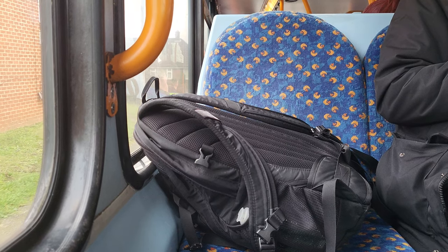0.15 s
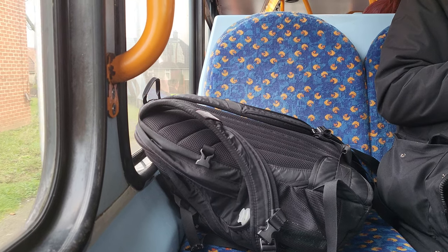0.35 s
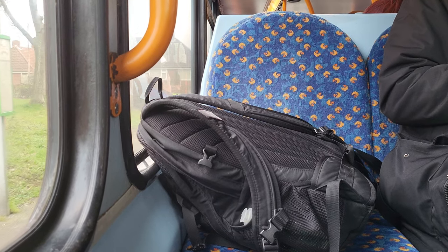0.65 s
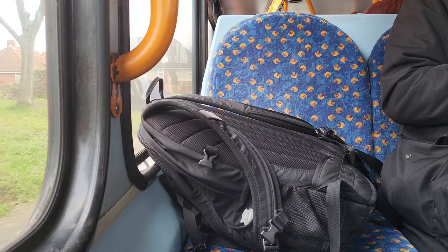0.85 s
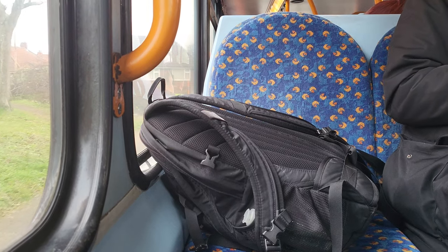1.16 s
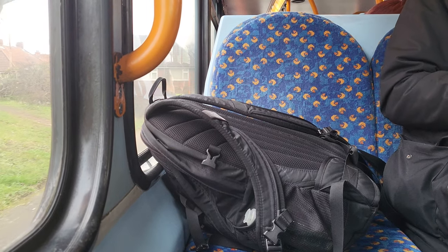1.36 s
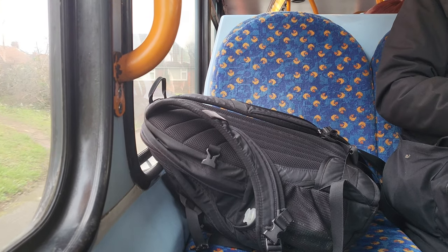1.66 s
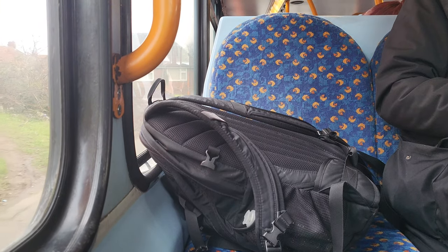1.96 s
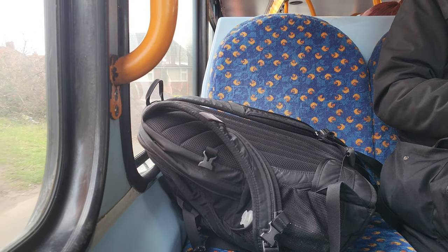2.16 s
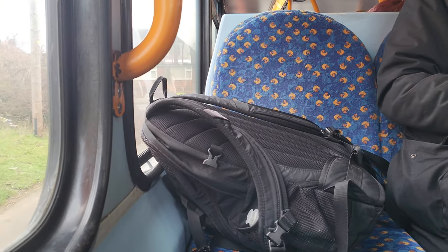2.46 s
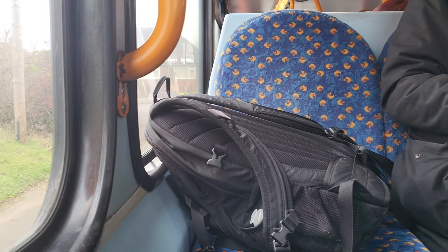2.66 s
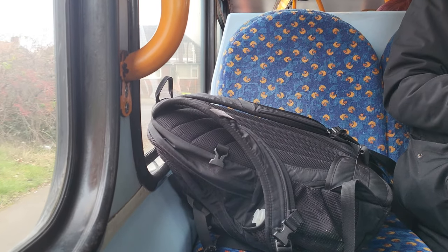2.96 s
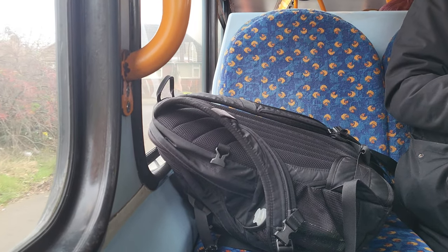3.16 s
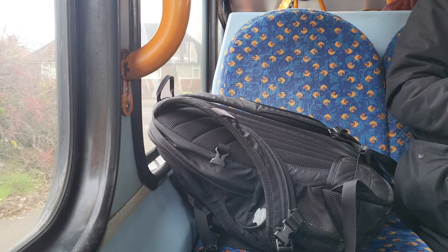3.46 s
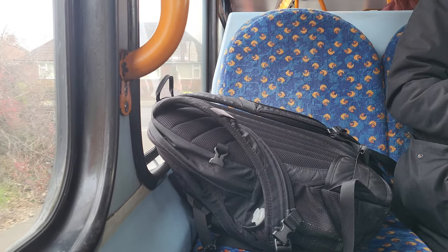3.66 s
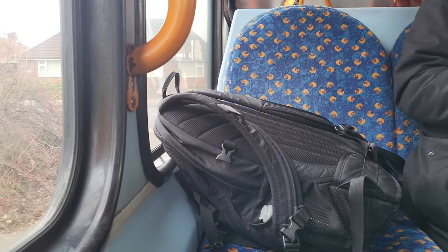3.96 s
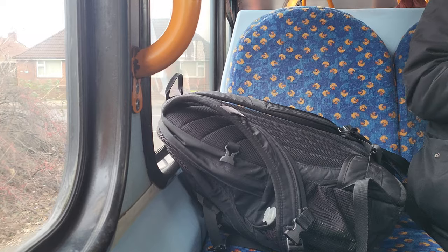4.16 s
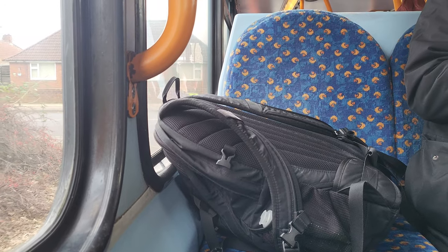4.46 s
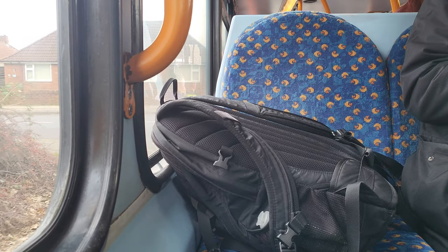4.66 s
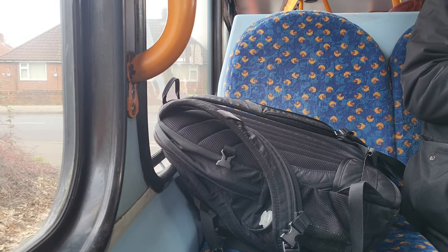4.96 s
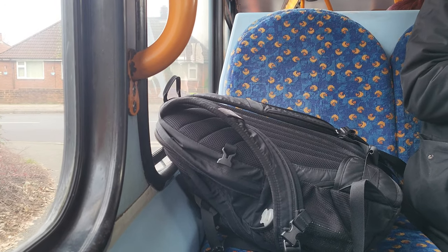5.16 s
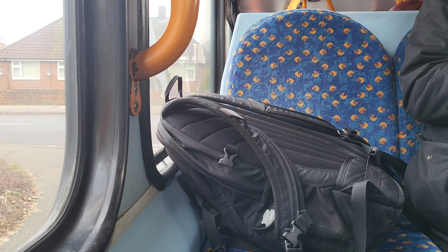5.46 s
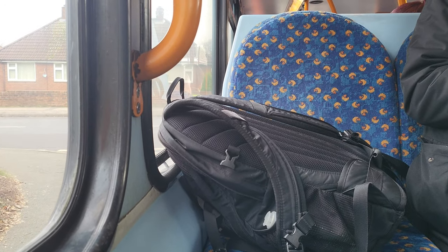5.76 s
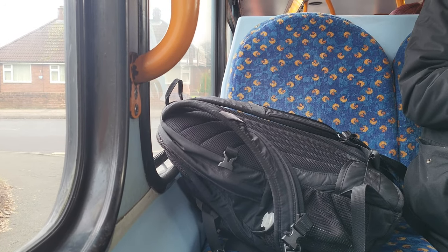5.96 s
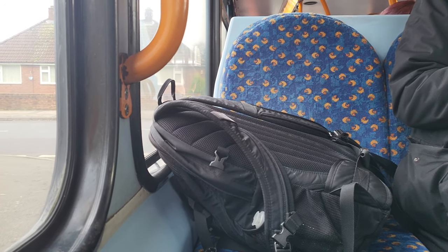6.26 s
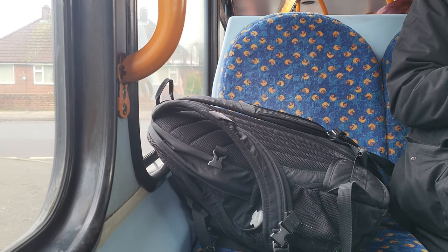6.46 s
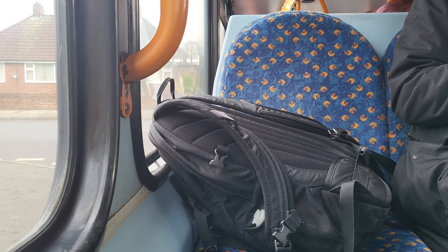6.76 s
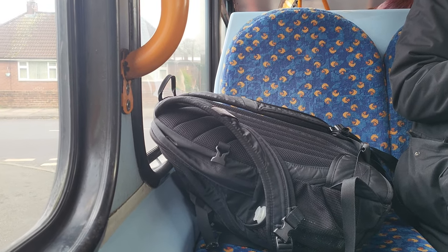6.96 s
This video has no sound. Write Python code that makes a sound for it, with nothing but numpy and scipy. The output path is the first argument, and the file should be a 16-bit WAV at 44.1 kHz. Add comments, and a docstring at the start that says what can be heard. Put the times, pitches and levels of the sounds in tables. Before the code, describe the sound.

Close cabin sound in stereo. A loud, low diesel roar climbs slightly, then the driver eases off and the note falls quickly while a brief gear whine and faint turbo whistle fade. Rumbling floor, thudding body and rattling panels accompany slowing. The engine throbs quietly and unevenly near idle, then accelerates again in the last half second.

```python
"""Inside a diesel bus, on a seat near the window: the six-cylinder engine pulls, lifts off, sinks to idle
while the brakes squeal thinly, and picks up again. The engine is a stack of sines on its firing and crank orders.
Exhaust leak, clatter and drone are noises pulsed by the firings; rumble, hum, buzz and air are shaped noises,
and a high noise band opens and closes. Turbocharger, axle gear, brakes and alternator are thin wandering sines.
Bumps in the road knock the body with decaying sines and shake the panels with grainy noise."""
import sys
import numpy as np
from scipy.fft import rfft, irfft, next_fast_len
from scipy.io import wavfile
from scipy.ndimage import uniform_filter1d

SR = 44100
rng = np.random.default_rng(int(sys.argv[2]) if len(sys.argv) > 2 else 0)


def store_wav(level_fs):
    """Save 16-bit WAV to argv[1]."""
    pcm = np.round(np.clip(np.atleast_2d(level_fs), -1, 1) * 32767)
    wavfile.write(sys.argv[1], SR, pcm.T.astype(np.int16))


N = 313551  # length in samples

# engine speed: t/s, firing rate/Hz
ENGINE_SPEED = [(0, 63.5), (.4, 65.4), (1.25, 67.7), (1.56, 68.3), (1.68, 64.5), (1.96, 52.3), (2.18, 45),
                (2.33, 38.1), (2.45, 37.6), (2.81, 38.2), (2.93, 36.4), (3.21, 34.5), (3.52, 32.4),
                (3.68, 32), (3.88, 33), (4.1, 38.6), (4.32, 37.4), (4.65, 36.3), (5.25, 35.4), (5.92, 35.2),
                (6.18, 35.8), (6.54, 35.8), (6.71, 39.8), (6.99, 48.7), (7.11, 51.8)]
# driving effort and road: t/s, engine load re idle level/dB, road roughness re smooth level/dB
LOAD_AND_ROAD = [(0, 11.5, 1.5), (.25, 14, 1), (.6, 12, 1), (1.3, 13, -2), (1.55, 11, -0.5), (1.68, 2, 5),
                 (1.9, 2, -1), (2.2, -5.5, 3.5), (2.42, -3.5, 6), (2.7, -4, -2), (3.15, -2, 2),
                 (3.35, -1.5, 5.5), (3.55, 0.5, 0), (3.85, -5, 8), (4.12, -1.5, -3), (5.0, -4.5, -1),
                 (5.5, 0.5, 0), (6.4, -2.5, 1), (6.66, -0.5, 1), (6.77, 2, 2.5), (6.82, 6, 0),
                 (6.95, 8.5, -2), (7.11, 8.5, 2.5)]
# firing orders in the cabin: t/s, first level/dB, second level/dB, fourth level/dB, all others re PIPE_PASS level/dB
FIRING_ORDERS = [(0, -23.5, -23.5, -37, 7.5), (.28, -17, -16.5, -22, 11.5), (.42, -22.5, -19, -25.5, 10),
                 (1.25, -13, -22.5, -27.5, 11.5), (1.58, -15, -23.5, -27, 10.5),
                 (1.7, -25, -25.5, -32.5, -3), (1.85, -34.5, -31, -42, -3), (2.0, -27.5, -42.5, -32, -3.5),
                 (2.22, -26, -36.5, -51, -5.5), (2.33, -24.5, -28, -23, -5), (2.45, -18.5, -28.5, -42, -5),
                 (2.6, -27, -33, -27, -7.5), (2.81, -18.5, -28, -31, 2), (2.93, -25, -25.5, -25, -4.5),
                 (3.3, -20.5, -25.5, -26, -5.5), (3.55, -23.5, -33, -26.5, -2.5),
                 (3.8, -25, -27.5, -33, 1.5), (3.93, -18, -21.5, -25, 1), (4.0, -20.5, -22.5, -28.5, -5.5),
                 (4.3, -24, -24.5, -28.5, -1), (4.65, -26.5, -24, -37, -8), (4.9, -24, -22, -38, -3),
                 (5.3, -20, -29, -29.5, 1.5), (5.62, -18.5, -28, -28.5, -2.5), (5.92, -18.5, -24, -26, -5),
                 (6.18, -21.5, -24.5, -29.5, -1.5), (6.54, -19, -19.5, -39, -3),
                 (6.72, -15.5, -20, -23.5, 1.5), (6.82, -16, -36.5, -28, -0.5),
                 (6.93, -24.5, -24, -34, 2.5), (7.11, -13.5, -30.5, -36, 3.5)]
# how exhaust and cabin pass the other firing orders: f/Hz, level/dB
PIPE_PASS = [(95, -34.5), (106, -32), (116, -39.5), (150, -26.5), (178, -33.5), (200, -32), (215, -31.5),
             (226, -25.5), (250, -32.5), (268, -32), (282, -25.5), (305, -40.5), (335, -42.5), (372, -37),
             (388, -26), (408, -49.5), (460, -40.5), (540, -40), (600, -53), (670, -52.5), (740, -40.5),
             (810, -45.5), (870, -39.5), (960, -62)]
# how the cabin passes the weak crank orders: f/Hz, gain/dB
CABIN_PASS = [(20, -22), (45, -11), (100, -8), (180, -5), (280, -22.5), (350, -18.5), (410, -17),
              (480, -11.5), (600, -22), (750, -39.5), (900, -23), (1000, -50.5)]
# how each layer rides the drive: layer: (base level/dB, dB per dB of load, dB per dB of roughness)
LAYER_FOLLOW = {"crank": (-46, 1.17, 1), "clatter": (-51, -0.22, 0.09), "rumble": (-28.5, 0.32, .9),
                "buzz": (-47.5, .5, 0.97), "hum": (-43, 0.97, 0.12), "drone": (-36, 0.47, .6),
                "leak": (-51, 0.8, .1), "air": (-76.5, 0.73, .1)}
# noise colours, of which only the shape counts: f/Hz, level/dB per Hz
LEAK_COLOUR = [(650, -37.5), (1100, 3.5), (1140, -1), (1330, -1.5), (1410, -8), (1590, -2.5), (1690, -6),
               (2410, -2.5), (3040, -16), (3340, -11), (3960, -17.5), (4630, -16), (6040, -21),
               (7370, -27.5), (8600, -49.5), (11200, -70), (18900, -120)]
DRONE_COLOUR = [(200, -30.5), (300, 1), (350, 6), (410, -5.5), (465, 3.5), (560, -4.5), (700, -6.5),
                (1000, -10), (1500, -19.5), (2200, -62)]
RUMBLE_COLOUR = [(6, -28), (16, -6), (28, 3), (40, 15), (90, 10.5), (150, 8.5), (260, 7), (330, -9.5),
                 (500, -58)]
PANEL_COLOUR = [(300, -59.5), (500, 6.5), (1000, -1), (2200, 0.5), (4000, -4.5), (8000, -19), (12000, -24),
                (15500, -30.5)]
HIGH_BAND_COLOUR = [(4120, -30), (7000, 8), (7610, 5), (8330, -7), (13200, -2), (14700, -10.5),
                    (15600, -17)]
AIR_COLOUR = [(5000, -10.5), (7500, 9), (8500, -2.5), (11000, 3.5), (12000, -8), (15600, -9.5)]
# resonances of engine cover, floor pans and seat frames: f/Hz, -6 dB width/Hz, relative level/dB
COVER_MODES = [(1110, 830, 9), (1700, 210, 5), (2140, 470, 2), (3050, 170, -3), (4426, 650, -4),
               (5840, 210, -17.5), (6660, 850, -18)]
FLOOR_PAN_MODES = [(222, 5.5, 0), (279.8, 14, -3.5), (384.2, 7.2, -3), (668, 6.9, -11)]
SEAT_FRAME_MODES = [(452.4, 18, 1.5), (486, 9.9, -1.5)]
# bumps: t/s, rattle level/dB, thud level/dB, rattle tilt/dB per octave, rattle t60/s,
# loudest panel f/Hz, its boost level/dB
ROAD_BUMPS = [(0.289, -20.5, -3.5, -3.5, 0.14, 2320, 4.5), (.302, -28, -24.5, -0.5, 0.3, 1390, 5),
              (0.396, -40, -9.5, 1, 0.33, 2400, 5.5), (2.131, -32.5, -22.5, -5.5, 1, 476, 29.5),
              (2.015, -42.5, -31, 0.5, .08, 1910, 30), (2.258, -48, -34.5, -1, 0.07, 3550, 20.5),
              (2.359, -41, -9, -3.5, 0.14, 475, 7), (2.404, -42, -21.5, -4.5, 0.23, 1870, 7.5),
              (2.883, -43.5, -13.5, 1.5, 0.18, 5900, 11.5), (3.386, -38, -22.5, -5.5, 0.12, 2140, 17.5),
              (3.826, -26, -10.5, -10, 0.32, 485, 8.5), (3.869, -49.5, -20.5, 3.5, 0.51, 3560, 4.5),
              (3.966, -54, -8.5, 2, 0.26, 2000, 0.5), (4.091, -44, -13.5, 0.5, 0.17, 1520, 19),
              (4.151, -52.5, -15, 4, .15, 11000, 3.5), (4.43, -40, -29.5, -6, .2, 490, 15),
              (4.503, -62.5, -15.5, 2, 0.045, 500, 13.5)]
# body modes of a thud: f/Hz, relative level/dB, t60/s
BODY_MODES = [(45.7, -0.5, 0.22), (75.6, -2, 0.18), (144.8, -12, 0.48)]
# brake squeals, one list each: t/s, f/Hz, level/dB
BRAKE_SQUEALS = [
    [(2.57, 12242, -88), (2.62, 12519, -63), (2.686, 12723, -64), (2.9, 12795, -60), (3.134, 12775, -57),
     (3.19, 12810, -61), (3.222, 12965, -67), (3.3, 12806, -80)],
    [(3.55, 14362, -80), (3.75, 14238, -82), (4.4, 14295, -72), (4.6, 14202, -77), (5.06, 14120, -74),
     (5.5, 14280, -77), (5.75, 14285, -71), (6.0, 14313, -75), (6.12, 14240, -77), (6.22, 13967, -83)],
]
# axle gear whine: t/s, f/Hz, level/dB
AXLE_WHINE = [(1.15, 428, -44), (1.35, 446, -36), (1.55, 462, -33), (1.8, 477, -36), (2.0, 484, -44)]
# turbocharger running down: t/s, f/Hz, level/dB
TURBO_WHISTLE = [(1.5, 5750, -74), (1.65, 5600, -69), (1.85, 5350, -70), (2.0, 5200, -76)]
# alternator lines: f/Hz, level/dB
ALTERNATOR_LINES = [(577, -53.5), (866, -61)]
# spells when the band above 7 kHz is open: start t/s, length/s, level/dB before HIGH_BAND_TRIM_DB
BAND_SPELLS = [(0, 0.13, -61.5), (0.281, 0.054, -48), (0.364, 0.084, -67), (1.269, .39, -65.5),
               (1.769, 0.042, -71.5), (2.379, 0.17, -68), (2.869, 0.066, -72.5), (3.282, 0.48, -67),
               (3.836, 0.5, -68), (6.881, 0.27, -74.5)]
# stereo width: f/Hz, left-right likeness (1 same, 0 unrelated, -1 opposed)
LIKENESS = [(60, 0.99), (99, 1), (160, 0.99), (270, 1), (450, 0.25), (740, 0.51), (1220, -0.66),
            (2010, -0.11), (3330, -0.039), (5500, -0.083), (9080, -0.12), (15000, 0.91)]
# stereo balance: f/Hz, left minus right level/dB
BALANCE = [(60, 0.5), (110, -3), (200, 1.5), (380, -0.5), (700, -4), (1290, 0.5), (2380, -3.0), (4400, 3),
           (8120, -0.5), (15000, 9.5)]

# the firing orders waver more in this stretch, off load and braking
UNSTEADY_FROM_S, UNSTEADY_TO_S = 1.66, 4.0
STEADY_WAVER_DB, UNSTEADY_WAVER_DB = 0.9, 4
BLUR_RAD_PER_DB = 0.06  # phase blur per dB of waver, for each octave above the first order
ORDER_FALL_DB = 10  # per octave of order above the third
DRONE_TRIM_DB, HIGH_BAND_TRIM_DB = -4.0, 1.5
SPELL_EDGE = 0.23  # share of a spell spent opening, and again closing
TOP_HZ = 15760  # band limit


def engine(firings, rate, weak_db):
    """Firing orders line up into one push per firing at speed and slide apart towards idle.
    Unequal cylinders add a weak line at every crank order, three of which span one firing order."""
    loose_rad = 0.25 + 1.6 * (rate.max() - rate) / rate
    t = np.arange(N) / SR
    unsteady = (t > UNSTEADY_FROM_S) & (t < UNSTEADY_TO_S)
    waver_db = np.where(unsteady, UNSTEADY_WAVER_DB, STEADY_WAVER_DB)
    waver_db = uniform_filter1d(waver_db, size=SR // 10)
    first_db, second_db, fourth_db, others_db = curves(FIRING_ORDERS)
    strong = {1: first_db, 2: second_db, 4: fourth_db}
    out = 0
    for crank_order in range(2, 43):
        order = crank_order / 3
        hz = order * rate
        if crank_order % 3:
            db = weak_db + along(CABIN_PASS, hz) + 3 * wobble(2.5)
            start = 2 * np.pi * rng.random()
        else:
            if order in strong:
                db = strong[order]
            else:
                fall_db = ORDER_FALL_DB * np.log2(order / 3)
                db = others_db + along(PIPE_PASS, hz) - fall_db + waver_db * wobble(14)
            db = db + 0.9 * wobble(14)
            blur = BLUR_RAD_PER_DB * waver_db * np.log2(order) * wobble(25)
            start = 0.7 + loose_rad * wobble(0.8) + blur
        out += tone(order * firings, hz, db, start)
    return out


def chuff_pulse(firings):
    """Gain that jumps at each firing and dies away, harder for some cylinders and varying shot to shot."""
    which = firings.astype(int)
    cylinder_db = rng.normal(0, 6.7, size=6)[which % 6]
    shot_db = rng.normal(0, 3.3, which[-1] + 1)[which]
    return 1 + 0.24 * amp(cylinder_db + shot_db) * np.exp(-3 * (firings % 1))


def exhaust_leak(db, chuff):
    """Gas escaping from the leaking exhaust: noise chuffing once per firing."""
    noise = rush(lambda hz: along(LEAK_COLOUR, hz), chuff)
    return amp(db + 0.72 * wobble(11.0)) * noise


def valve_clatter(db, chuff):
    """Valves beating with the firings, noise ringing through the engine cover resonances."""
    noise = rush(lambda hz: peaks_db(COVER_MODES, hz), chuff ** 0.47)
    return amp(db + 1.1 * wobble(7.7)) * noise


def drone(db, chuff):
    """A low-mid noise drone, gently pulsed by the firings."""
    noise = rush(lambda hz: along(DRONE_COLOUR, hz), chuff ** 0.35)
    return amp(db + DRONE_TRIM_DB + 0.47 * wobble(4.3)) * noise


def bumps():
    """Each bump thuds the body modes and sets loose panels rattling in grainy, decaying noise."""
    out, t = np.zeros((2, N + SR)), np.arange(SR // 2) / SR
    for s, db, thud_db, tilt_db, t60, panel_hz, panel_db in ROAD_BUMPS:
        modes = [amp(level - 60 * t / decay) * np.sin(2 * np.pi * hz * t) for hz, level, decay in BODY_MODES]
        thud = -sum(modes) * (1 - np.exp(-t / 0.01))
        grain_db = 6.1 * uniform_filter1d(rng.standard_normal(len(t)), size=64)

        def colour_db(hz):
            """Panel colour with the loudest panel standing out and a tilt around 2 kHz."""
            loudest = panel_db / (1 + (hz - panel_hz) ** 2 / (0.08 * panel_hz) ** 2)
            return along(PANEL_COLOUR, hz) + loudest + tilt_db * np.log2(hz / 2000 + 0.01)

        rattle = rush(colour_db, amp(grain_db), len(t))
        fall = amp(db - 60 * t / max(t60, 0.02)) * (1 - np.exp(-t / 0.0024))
        begin = round(s * SR)
        out[:, begin:begin + len(t)] += amp(thud_db) * thud + fall * rattle
    return out[:, :N]


def rumble(db):
    """Floor and body rumbling in lumps: low noise under a restless level."""
    return amp(db + 1.5 * wobble(9)) * rush(lambda hz: along(RUMBLE_COLOUR, hz))


def floor_hum(db):
    """Floor pans humming: noise through narrow resonances."""
    return amp(db) * rush(lambda hz: peaks_db(FLOOR_PAN_MODES, hz))


def seat_buzz(db):
    """Seat frames buzzing: noise through two resonances, fluttering in level."""
    return amp(db + 4 * wobble(5)) * rush(lambda hz: peaks_db(SEAT_FRAME_MODES, hz))


def brakes():
    """Brakes squealing as thin, high, wandering tones."""
    return sum(glide(rows, flutter_db=3, drift_hz=40) for rows in BRAKE_SQUEALS)


def axle_gear():
    """The axle gear whining as one gliding tone."""
    return glide(AXLE_WHINE, flutter_db=0.5, drift_hz=15.8)


def turbocharger():
    """The turbocharger running down: a whistle sliding lower."""
    return glide(TURBO_WHISTLE, flutter_db=1.5, drift_hz=90)


def alternator():
    """Faint alternator lines that hold their pitch but for a small jitter."""
    lines = [[(0, hz, db), (N / SR, hz, db)] for hz, db in ALTERNATOR_LINES]
    return sum(glide(rows, flutter_db=3.5, drift_hz=14) for rows in lines)


def high_band_noise():
    """A high noise band that opens and closes, overlapping spells adding in power."""
    t = np.arange(N) / SR
    power = 1e-12
    for s, length, db in BAND_SPELLS:
        to_edge = np.minimum(t - s, s + length - t)
        opening = np.clip(to_edge / (SPELL_EDGE * length), 0, 1)
        power = power + (amp(db) * opening) ** 2
    band_db = 10 * np.log10(power)
    noise = rush(lambda hz: along(HIGH_BAND_COLOUR, hz))
    return amp(band_db + HIGH_BAND_TRIM_DB + 1.1 * wobble(8.1)) * noise


def air_noise(db):
    """A bed of high air noise riding mostly on the engine load."""
    return amp(db) * rush(lambda hz: along(AIR_COLOUR, hz))


def rush(colour_db, pulse=1, n=N):
    """Pulsed white noise pair, coloured to stereo of rms 1; mid-side mixing sets the left-right likeness."""
    def mid_side(hz):
        turn = np.arccos(np.clip(along(LIKENESS, hz), -1, 1)) / 2
        return amp(colour_db(hz)) * [np.cos(turn), np.sin(turn)]

    mid, side = filtered(rng.standard_normal((2, n)) * pulse, mid_side)
    return unit(np.array([mid + side, mid - side]))


def tone(cycles, hz, db, start=0):
    """A stereo sine, db the rms level of the channel mean; cabin standing waves shift one side on the other."""
    shift = np.arccos(np.clip(along(LIKENESS, np.mean(hz)), 0, 1)) / 2
    angle = 2 * np.pi * (cycles % 1) + start + np.array([[shift], [-shift]])
    return np.sqrt(2) / np.cos(shift) * amp(db) * np.cos(angle.astype(np.float32))


def glide(rows, flutter_db, drift_hz):
    """A thin unsteady tone that sounds only between its first and last row."""
    hz, db = curves(rows)
    t = np.arange(N) / SR
    fade = np.clip(np.minimum(t - rows[0][0], rows[-1][0] - t) / 0.017, 0, 1)
    hz = hz + drift_hz * wobble(500)
    return fade * tone(np.cumsum(hz) / SR, hz, db + flutter_db * wobble(35))


def peaks_db(modes, hz):
    """Level of a set of resonances, added in power."""
    power = 0
    for centre, width, db in modes:
        power = power + amp(db) ** 2 / (1 + (2 * (hz - centre) / width) ** 2) ** 2
    return 10 * np.log10(power)


def filtered(x, response):
    """x shaped by a gain over frequency."""
    n = x.shape[-1]
    m = next_fast_len(n + 8192)
    return irfft(rfft(x, m) * response(np.fft.rfftfreq(m, 1 / SR)), m)[..., :n]


def along(points, hz):
    """Value at hz from frequency-value points, on a log axis."""
    f, v = np.transpose(points)
    return np.interp(np.log(hz + 1), np.log(f + 1), v)


def curves(rows):
    """One value per sample for each column after the time."""
    s, *cols = np.transpose(rows)
    return [np.interp(np.arange(N) / SR, s, c) for c in cols]


def wobble(rate):
    """A random curve with rate knots a second."""
    knots = rng.standard_normal(int(N * rate / SR) + 2)
    return np.interp(np.arange(N) * rate / SR, np.arange(len(knots)), knots)


def amp(db):
    """Gain of a level in dB."""
    return np.exp(np.asarray(db) * (np.log(10) / 20))


def unit(x):
    """x at rms 1."""
    return x / np.sqrt(np.mean(x ** 2) + 1e-20)


def scene():
    """Everything heard from the seat, riding on engine speed, load and road."""
    rate, = curves(ENGINE_SPEED)
    load_db, road_db = curves(LOAD_AND_ROAD)
    db = {}
    for name, (base_db, pull, shake) in LAYER_FOLLOW.items():
        db[name] = base_db + pull * load_db + shake * road_db
    firings = np.cumsum(rate) / SR
    chuff = chuff_pulse(firings)
    motor = engine(firings, rate, db["crank"])
    motor += exhaust_leak(db["leak"], chuff) + valve_clatter(db["clatter"], chuff) + drone(db["drone"], chuff)
    body = bumps() + rumble(db["rumble"]) + floor_hum(db["hum"]) + seat_buzz(db["buzz"])
    tones = brakes() + axle_gear() + turbocharger() + alternator()
    return motor + body + tones + high_band_noise() + air_noise(db["air"])


def record(dry):
    """Left and right differ a little in colour, the highest peaks are rounded, the top band is cut."""
    ending = np.sin(np.pi / 2 * np.clip(np.arange(N)[::-1] / 300, 0, 1)) ** 2  # ends without a click
    half_each = np.array([[0.5], [-0.5]])
    stereo = filtered(dry * ending, lambda hz: amp(half_each * along(BALANCE, hz)))
    rounded = stereo / (1 + (stereo / 0.96) ** 12) ** (1 / 12)
    return filtered(rounded, lambda hz: hz < TOP_HZ)


dry = scene()
out = record(dry)
store_wav(out)
```